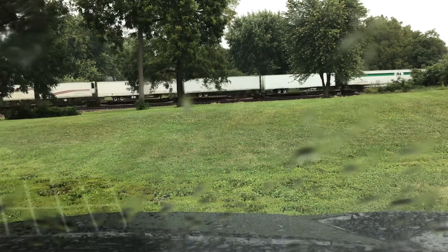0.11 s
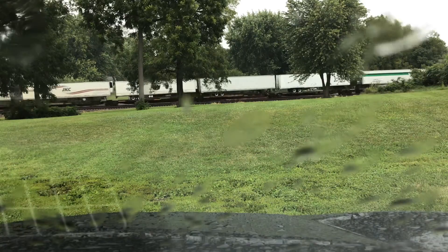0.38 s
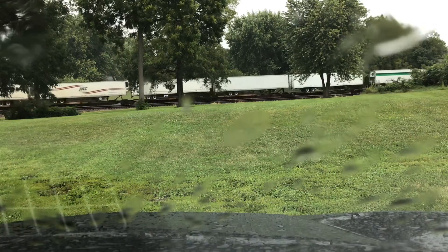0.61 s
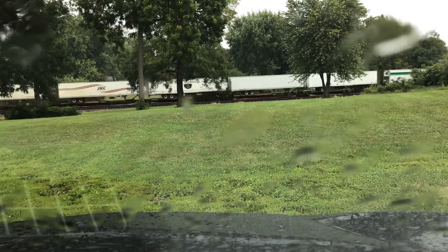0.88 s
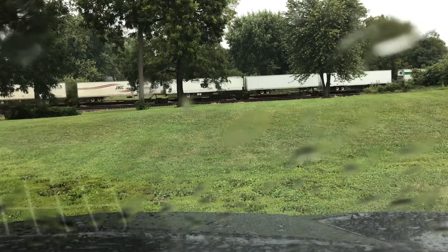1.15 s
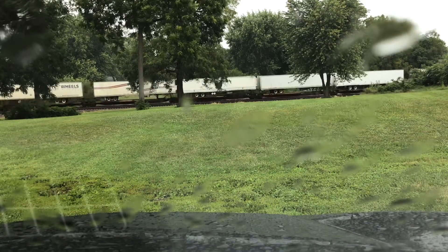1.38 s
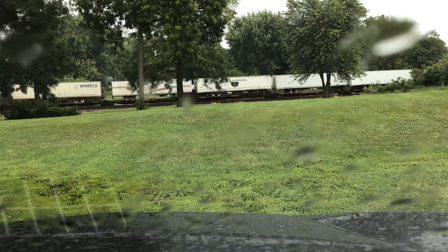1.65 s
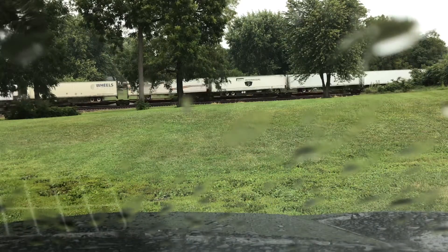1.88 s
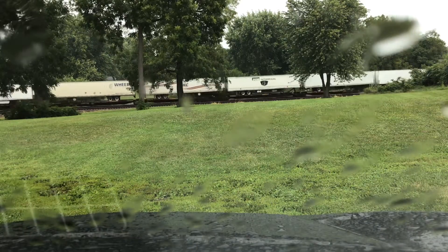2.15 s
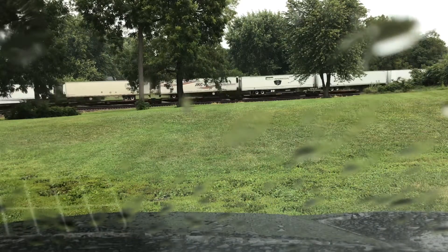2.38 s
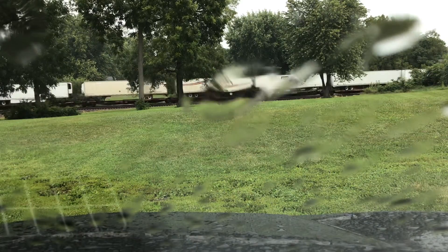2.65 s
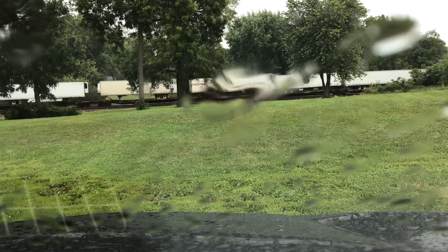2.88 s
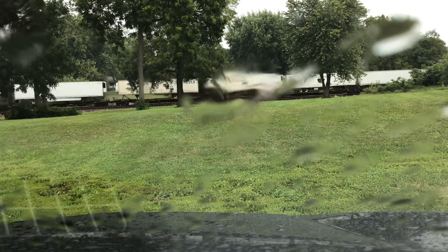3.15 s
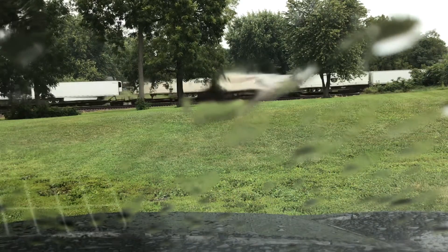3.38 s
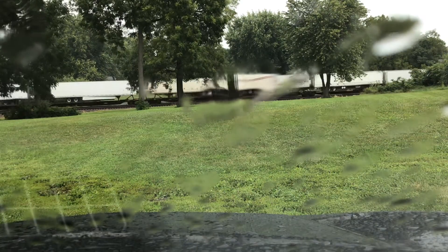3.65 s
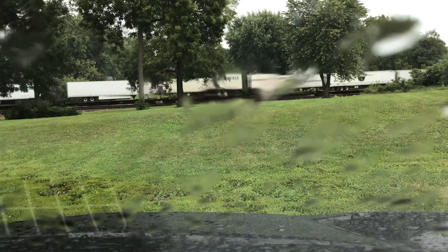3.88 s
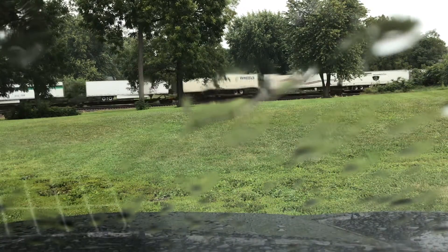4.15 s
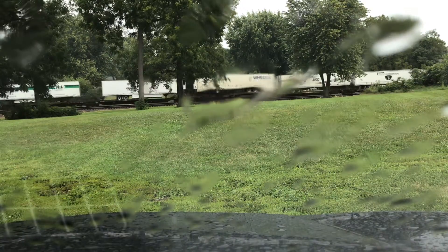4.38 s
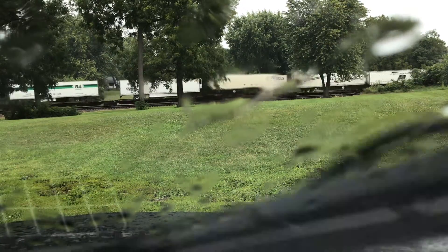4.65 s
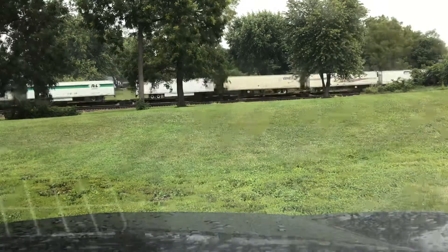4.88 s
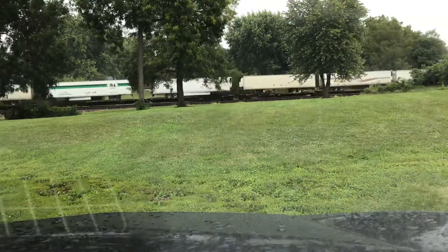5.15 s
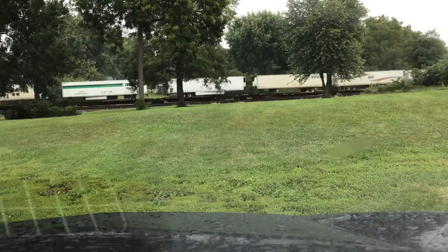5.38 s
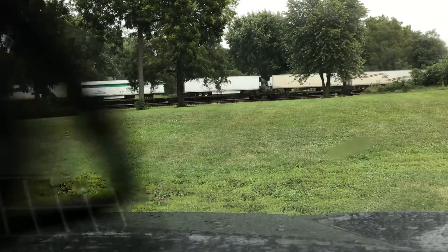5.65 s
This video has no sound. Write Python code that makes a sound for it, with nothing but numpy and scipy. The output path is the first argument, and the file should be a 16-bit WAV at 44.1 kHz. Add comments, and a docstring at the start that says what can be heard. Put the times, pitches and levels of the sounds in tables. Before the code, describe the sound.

Closed car cabin, one microphone: deep continuous rolling noise of a distant train blends with a low wavering engine hum. Faint metallic rail rings appear early, and light rain ticks throughout with occasional heavier drops. Near the end come sharp plastic clicks, dull low body thumps, short juddering blade rubs and small wet splashes, while the train keeps rolling.

```python
"""Inside a standing car in light rain, one microphone in the cabin: a long freight train rolls past
at a distance. Its rolling noise is random spectra muffled by the cabin; the idling engine is tones
on one wavering speed, with hums and whines. Drops on roof and glass are short puffs of noise. Near
the end the wipers switch on with a click, sweep and thud back: rattles, rubs and body rings."""
import sys
import numpy as np
from scipy import signal
from scipy.io import wavfile
from scipy.ndimage import uniform_filter1d

SR = 44100
rng = np.random.default_rng(int(sys.argv[2]) if len(sys.argv) > 2 else 0)


def materialize(psi):
    """Save the field psi as 16-bit PCM at rate SR to the path in sys.argv[1].

    A 1-D psi becomes a single channel; in a 2-D psi each row is a channel.
    """
    bounded = np.clip(np.atleast_2d(psi).T, -1, 1)
    quanta = np.round(bounded * 32767).astype(np.int16)
    wavfile.write(sys.argv[1], SR, quanta)


def voltage_ratio(level):
    """Linear amplitude factor for a level in decibels (scalar or array-like)."""
    return 10 ** (np.asarray(level, float) / 20)


N = 254456  # samples


def evened(x):
    """Scales to rms 1."""
    return x / np.sqrt(np.mean(x ** 2) + 1e-20)


def add(mix, start_s, sound):
    """Mixes a sound in at start_s seconds."""
    part = mix[round(start_s * SR):][:len(sound)]
    part += sound[:len(part)]


def resonate(x, hz, width_hz):
    """Shifts hz down to zero, smooths, and shifts back: a one-pole resonance."""
    turn = np.exp(2j * np.pi * np.cumsum(hz * np.ones(len(x))) / SR)
    pole = np.exp(-np.pi * width_hz / SR)
    smooth = signal.lfilter([1 - pole], [1, -pole], x / turn)
    return 2 * (turn * smooth).real


def narrow_noise(length, hz, width_hz):
    """White noise through the same resonance twice, so that the skirts fall faster."""
    return resonate(resonate(rng.standard_normal(length), hz, width_hz), hz, width_hz)


def drift(rate_hz):
    """Slow random wander of rms 1: noise smoothed below rate_hz, after a second to settle."""
    pole = np.exp(-2 * np.pi * rate_hz / SR)
    return evened(signal.lfilter([1], [1, -pole], rng.standard_normal(N + SR))[SR:])


def swell(rows, rough):
    """Sines that swell and fade, each with noise of rms rough around the same pitch."""
    out = np.zeros(N)
    for middle, db, hz, length in rows:
        t = np.arange(round(length * SR)) / SR
        noise = evened(narrow_noise(SR // 2, hz, 7.1 / length))[-len(t):]
        ring = np.sin(2 * np.pi * hz * t) + rough * noise
        add(out, middle - length / 2, voltage_ratio(db) * np.hanning(len(t)) * ring)
    return out


# distant rolling noise through the closed cabin: (frequency [Hz], relative density [dB per Hz])
ROLLING_COLOUR = [(18, -63), (30, -27), (62, -5.5), (103, -3), (238, -8.5), (317, -6.5), (469, -16.5),
                  (549, -16), (677, -24), (835, -27), (1060, -34), (1570, -42.5), (4020, -47),
                  (5360, -52.5), (15700, -61.5)]
# cabin and body panel resonances on it: (frequency [Hz], width [Hz], lift [dB])
CABIN_RESONANCES = [(75.4, 5.6, 10), (112, 26.4, 3.5), (195, 16, 0.5), (400, 18, 3.5), (504, 20, 0.5),
                    (826, 134, 6.5), (1284, 146, 4.5), (2150, 890, 4), (4050, 120, 3.5), (6240, 730, -1),
                    (9370, 2600, 4)]
# wagons come and go past the car: (time [s], relative level [dB])
WAGON_SWELL = [(0, 2.5), (.35, 0.3), (.7, 0.6), (1.1, -1), (1.7, 0.95), (2.3, 0.55), (3, 0.7), (3.35, 0.6),
               (3.8, 1.1), (4.6, 0.7), (5, -.3), (5.3, 0.5), (5.77, 1.5)]
# how far each band follows the wagons: (rumble, wheel and rail noise, hiss) [share of the dB]
SWELL_SHARES = [0.77, 0.84, 0.57]
ROLLING_DB = -43  # rms


def train():
    """Random short-time spectra coloured by the cabin, uneven at random in time and from band to band."""
    frames, hz = N // 512 + 5, np.fft.rfftfreq(2048, 1 / SR)
    real, imaginary, patches = rng.standard_normal((frames, 1025, 3)).T
    patches = uniform_filter1d(patches, size=40, axis=0)  # across frequency
    patches = evened(uniform_filter1d(patches, size=4, axis=1))  # across time

    colour_hz, density_db = np.transpose(ROLLING_COLOUR)
    colour_db = np.interp(np.log(hz + 1), np.log(colour_hz + 1), density_db)
    for centre, width, lift_db in CABIN_RESONANCES:
        colour_db += lift_db / (1 + (2 * (hz - centre) / width) ** 2)

    wagons_db = np.interp(np.arange(frames) * 512 / SR, *np.transpose(WAGON_SWELL))
    rumble_db, wheels_db, hiss_db = np.outer(SWELL_SHARES, wagons_db)
    low = 1 / (1 + (hz[:, None] / 500) ** 2)
    high = 1 / (1 + (6000 / (hz[:, None] + 1)) ** 2)
    middle = 1 - low - high
    swell_db = low * rumble_db + middle * wheels_db + high * hiss_db
    depth_db = 0.5 * low + 0.82 * middle + 0.73 * high  # bass and hiss are smoother than the clatter

    level_db = colour_db[:, None] + swell_db + depth_db * patches
    spectra = (real + 1j * imaginary) * voltage_ratio(level_db)
    noise = signal.istft(spectra, nperseg=2048, noverlap=1536)[1][:N]
    return voltage_ratio(ROLLING_DB) * evened(noise)


# a droning body panel, one row: (frequency [Hz], width [Hz], rms level [dB])
PANEL = (315, 7.8, -57)


def drone():
    """Steady noise in one narrow panel resonance."""
    hz, width_hz, db = PANEL
    return voltage_ratio(db) * evened(narrow_noise(N, hz, width_hz))


# wheels ringing on the distant rail: (middle [s], peak level of the sine [dB], pitch [Hz], length [s])
RAIL_RINGS = [(1.356, -71, 2060, .03), (1.469, -70, 2016, .03), (1.525, -65.5, 2063, 0.073),
              (1.575, -68, 2070, 0.026), (1.707, -67, 2020, 0.026), (1.876, -69, 2280, .03),
              (1.898, -70, 2030, 0.027), (2.99, -68, 3050, .014)]


def squeaks():
    """Short narrow rings of wheels on the rail, blurred by distance: somewhat more noise than sine."""
    return swell(RAIL_RINGS, 0.89)


def tone(hz, waver):
    """A sine of rms 1 whose pitch strays by a small share."""
    cycles = np.cumsum(hz * (1 + waver * drift(1.0))) / SR
    return np.sqrt(2) * np.sin(2 * np.pi * (cycles + rng.random()))


CYCLE_HZ = 7.4  # engine cycle at idle
# engine tones heard in the cabin: (multiple of the cycle), and for each (rms level [dB])
ENGINE_ORDERS = [10, 12, 15, 16, 18, 20, 22, 26]
ENGINE_ORDERS_DB = [-66, -53.5, -61.5, -52, -59, -60, -54.5, -55.5]
# lower and upper hum: (pitch [Hz]), and for each (rms level before the fades [dB])
HUM_PITCHES = [81.1, 104.6]
HUM_LEVELS = [-45.5, -49]
# the hums fade or rise for a moment: (middle [s], length [s], lower hum [dB], upper hum [dB])
HUM_FADES = [(.2, .8, 2, -11), (1.2, 0.58, -29, 5), (1.68, .45, -20, -6), (2.606, 0.43, 1, -1),
             (3.783, 0.27, -7.5, -19), (4.057, 0.62, -5, 3), (4.35, 0.45, -2.5, -16), (4.8, 0.51, -6, -1),
             (5.71, 0.56, 2, 0)]
# thin tones of fan and electrics: (pitch [Hz]), and for each (rms level [dB])
WHINE_PITCHES = [550.1, 556.8, 13824, 14460, 15633]
WHINE_LEVELS = [-72.5, -63, -105, -100, -102]


def engine():
    """Multiples of the engine cycle share one wavering speed; hums and whines run on their own."""
    turns = np.cumsum(CYCLE_HZ * (1 + 0.0017 * drift(0.53))) / SR
    out = np.zeros(N)
    for order, db in zip(ENGINE_ORDERS, ENGINE_ORDERS_DB):
        out += voltage_ratio(db) * np.sqrt(2) * np.sin(2 * np.pi * (order * turns + rng.random()))

    t = np.arange(N) / SR
    fades_db = np.zeros((2, N))
    for middle, length, *hums_db in HUM_FADES:
        triangle = np.maximum(1 - abs(t - middle) / (length / 2), 0)
        fades_db += np.outer(hums_db, triangle)
    for hz, db, fade_db in zip(HUM_PITCHES, HUM_LEVELS, fades_db):
        out += voltage_ratio(db + fade_db) * tone(hz, 0.00927)

    for hz, db in zip(WHINE_PITCHES, WHINE_LEVELS):
        out += voltage_ratio(db) * tone(hz, 0.00043)
    return out


# jolts of the wiper drive: (middle [s], level [dB], pitch [Hz], reach [octaves])
JOLTS = [(4.379, -32.5, 590, 0.18), (4.395, -30, 101, 0.22), (4.442, -30, 113.1, 0.28),
         (4.452, -35, 220, .6), (4.474, -32.5, 130, 0.7), (4.51, -35.5, 100, 0.18),
         (4.556, -29, 66.6, 0.24), (4.622, -35, 72, 0.12), (4.688, -38, 74, 0.09),
         (4.921, -30, 82.6, 0.088), (5.06, -31.5, 110, 0.14), (5.119, -33, 108, 0.15),
         (5.18, -40.5, 420, .2), (5.2, -30, 102, 0.49), (5.24, -39.5, 200, 0.58), (5.276, -37, 111, 0.9),
         (5.28, -39.5, 288.6, 0.43), (5.335, -32.5, 108, .2), (5.429, -35.5, 82, 0.086),
         (5.549, -38, 95, 0.29), (5.68, -38.5, 113, .1), (5.739, -35.5, 79, 0.12)]
# what the car body rings with: (frequency [Hz], relative level [dB], length of the swell [s])
BODY_MODES = [(53.3, 0, .22), (72.7, 2, 0.0994), (82, -3.2, 0.1205), (95.9, -2.1, 0.0712),
              (112.4, -2, 0.0604), (167.5, 0, .07), (231, -2, 0.042), (298.4, -5, 0.13), (420, -4, 0.027),
              (602, -10.5, .035)]
# blades rubbing on the glass: (start [s], length [s], level before the judder [dB])
RUBS = [(4.402, 0.222, -74), (5.109, .07, -67), (5.237, .05, -67)]
JUDDER_HZ, JUDDER_DB = 13, 4.0  # corner of the random level wander, and its rms


def wipers():
    """Jolts swell and die in the body modes near their pitch; the blades rub and judder on glass."""
    rings = []
    for middle, db, pitch_hz, reach in JOLTS:
        for hz, mode_db, length in BODY_MODES:
            octaves = np.log2(hz / pitch_hz)
            if abs(octaves) < 2 * reach:
                rings.append((middle, db + mode_db - 10.4 * (octaves / reach) ** 2, hz, length))
    out = swell(rings, 0.28)

    for start, length, db in RUBS:
        t = np.arange(0, length, 1 / SR)
        rub = evened(narrow_noise(len(t), 1600, 1800))
        judder_db = JUDDER_DB * drift(JUDDER_HZ)[:len(t)]
        ramps = np.clip(np.minimum(t, length - t) / 0.017, 0, 1)
        add(out, start, voltage_ratio(db + judder_db) * rub * ramps)
    return out


# switch and linkage inside the cabin: (start [s], relative level [dB], tilt around 3.5 kHz
# [dB per octave], lift near 8 kHz [dB])
SWITCH_CLICKS = [(2.485, -59, 10.5, -20), (4.361, -41.5, 2, -1), (4.396, -62.5, 11.5, -24),
                 (5.0622, -41, 2, -36), (5.422, -59, 6, -6), (5.442, -47.5, -5.5, 10),
                 (5.451, -52, -21, .1), (5.697, -81, 3, 32)]
# parts of a click near 1.8, 3.5, 8 and 13.5 kHz: (relative level [dB])
PARTS_DB = [-17, -11.5, -23.5, -23.5]
# modes of the plastic: (frequency [Hz], relative level [dB], length setting [s], longer is narrower)
PLASTIC_MODES = [(1450, 0.5, 0.066), (2150, -14, .06), (2730, 5, 0.2), (3700, -3, 0.089),
                 (4390, 3.5, 0.085), (5700, 7.5, 0.037), (6300, 9.5, 0.055), (8400, -22, .06),
                 (8670, 10, 0.041), (9600, 6, .07), (12700, -6, .06), (13500, -17, 0.042),
                 (14900, -13, .06)]
# contact snap and rebound: (delay after the start of a click [samples])
SNAP_DELAYS = [12, 60]
RATTLE_T60 = 0.058  # s


def clicks():
    """A sharp crack and a dense rattle through the modes of the plastic, dying away in the cabin."""
    out, t = np.zeros(N), np.arange(5000) / SR
    decay = voltage_ratio(-60 * (t / RATTLE_T60) ** 1.11)
    crack = 0.98 * np.exp(-t / 0.001)
    onset = 1 - np.exp(-t / 0.00039)
    for start, db, tilt_db, lift_db in SWITCH_CLICKS:
        octaves = np.log2(np.array([1800, 3500, 8000, 13500]) / 3500)
        parts_db = PARTS_DB + tilt_db * octaves + lift_db * (np.arange(4) == 2)
        rattle = rng.standard_normal(len(t)) * (decay + crack) * onset
        rattle[np.array(SNAP_DELAYS)] += 4.0, -3.0  # the contact snaps and rebounds once

        rings = np.zeros(len(t))
        for hz, mode_db, length in PLASTIC_MODES:
            ring_db = mode_db + np.interp(hz, [1800, 3400, 7900, 13500], parts_db)
            rings += voltage_ratio(ring_db) * resonate(rattle, hz, 16.3 / length) * np.sqrt(length)
        wide = np.zeros(len(t))
        for part_db, hz, width in zip(parts_db, [1800, 3560, 7850, 13500], [1200, 2460, 4930, 3500]):
            wide += voltage_ratio(part_db) * resonate(resonate(rattle, hz, width), hz, width)
        add(out, start, voltage_ratio(db) * (8.5 * rings + 0.85 * wide))
    return out


def splash(hz, t60, spread):
    """A drop: a puff of noise around one pitch (width = spread * hz) that dies at once."""
    t = np.arange(3000) / SR
    puff = evened(narrow_noise(len(t), hz, spread * hz))
    return puff * voltage_ratio(-60 * t / t60) * (1 - np.exp(-t / 0.0025))


# heaviest drops and splashes off the blades: (start [s], level before onset and decay [dB], pitch [Hz])
HEAVY_DROPS = [(1.49, -58, 3860), (2.311, -58, 2010), (2.486, -63.5, 4050), (2.935, -60, 3020),
               (3.145, -54, 1090), (3.827, -56, 2350), (3.963, -60, 4780), (4.16, -56, 1490),
               (4.466, -55, 1700), (4.767, -61, 2660), (4.791, -55.5, 3500), (4.906, -57, 3950),
               (5.126, -50.5, 1394), (5.164, -58, 1600), (5.248, -48, 1450), (5.252, -65, 2400),
               (5.263, -60, 1450), (5.271, -60, 2200)]


def rain():
    """Many small drops of uneven size on roof and glass, and the heaviest ones singly."""
    out = np.zeros(N)
    for hz in np.geomspace(900, 5500, num=24):
        size = voltage_ratio(2.2 * np.minimum(rng.exponential(1, N), 3))
        falls = size * (rng.random(N) < 9.0 / SR)  # about 9 drops a second at each pitch
        out += (1000 / hz) ** 0.55 * signal.oaconvolve(falls, splash(hz, 0.037, 0.55))[:N]
    out = voltage_ratio(-72.0) * evened(out)
    for start, db, hz in HEAVY_DROPS:
        add(out, start, voltage_ratio(db) * splash(hz, 0.036, 0.35))
    return out


# brief swells of treble hiss: (middle [s], half width [s], rms level at the top [dB])
HISS_SWELLS = [(.17, .12, -83), (4.75, 0.12, -78), (5.74, 0.087, -77)]


def hisses():
    """Wide treble noise under a few soft bell-shaped swells."""
    t = np.arange(N) / SR
    noise = evened(narrow_noise(N, 9000, 7000))
    return noise * sum(voltage_ratio(db) * np.exp(-((t - middle) / width) ** 2) for middle, width, db in HISS_SWELLS)


def scene():
    """All sources reach one microphone in the cabin."""
    near_and_far = train() + drone() + squeaks() + engine() + wipers() + clicks() + rain() + hisses()
    return near_and_far[None]


def roll_off(x):
    """The treble ends steeply here."""
    return signal.sosfilt(signal.butter(12, 16310, fs=SR, output="sos"), x)


def record(dry):
    """The microphone cuts the deepest bass, and the band ends in the high treble."""
    bass_cut = signal.butter(4, 50.0, "high", fs=SR, output="sos")
    heard = signal.sosfilt(bass_cut, dry)
    treble_edge = signal.firwin(511, 15750, window=("kaiser", 9), fs=SR)
    mix = signal.oaconvolve(heard, treble_edge[None], "same")
    return roll_off(mix)


dry = scene()
out = record(dry)
materialize(out)
```